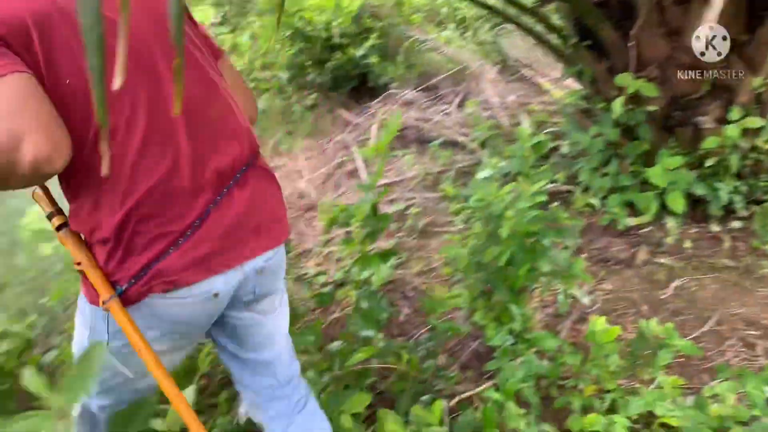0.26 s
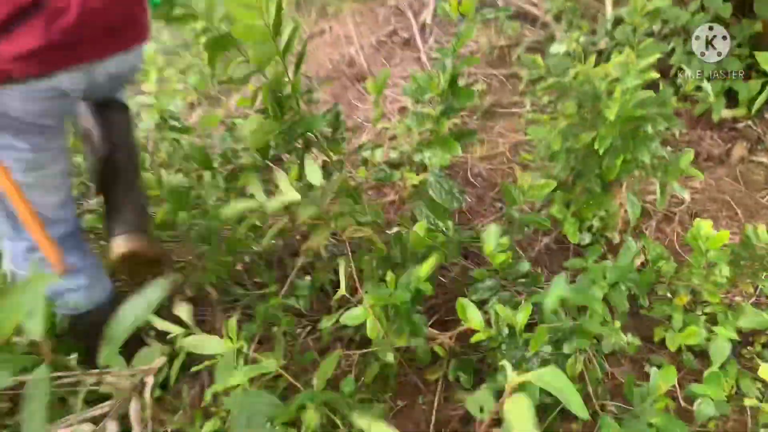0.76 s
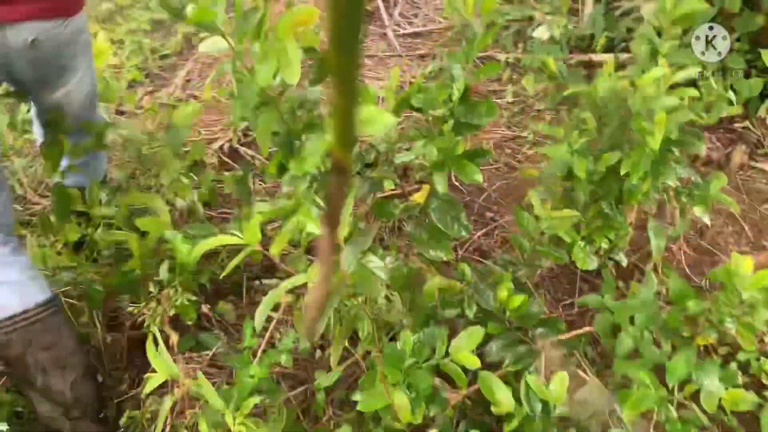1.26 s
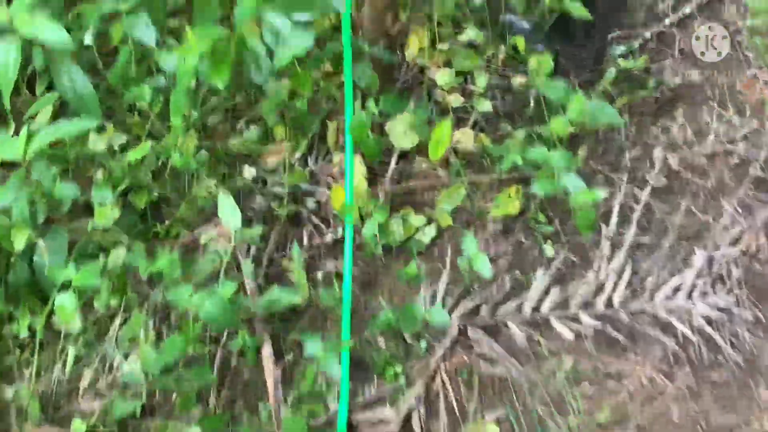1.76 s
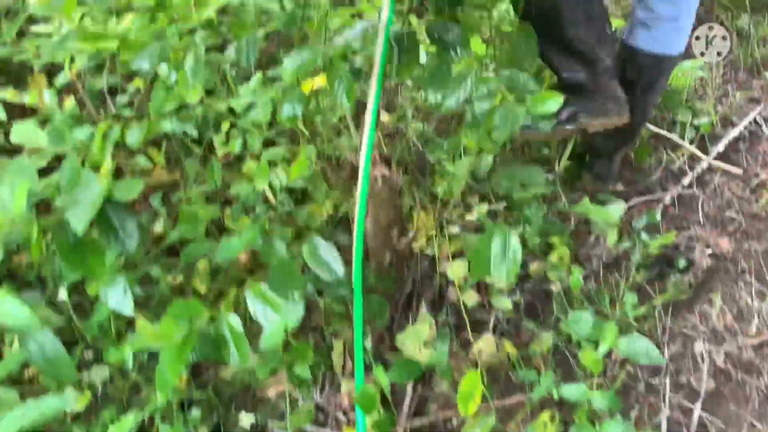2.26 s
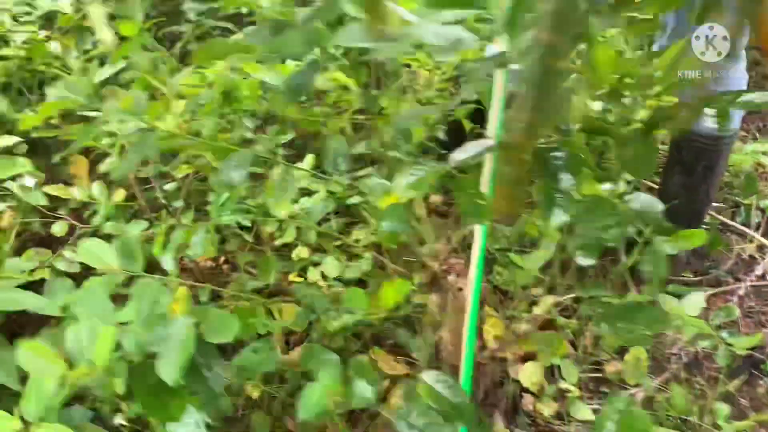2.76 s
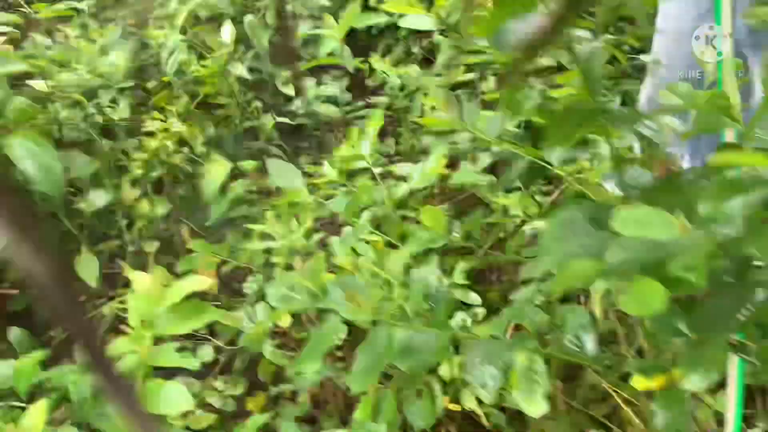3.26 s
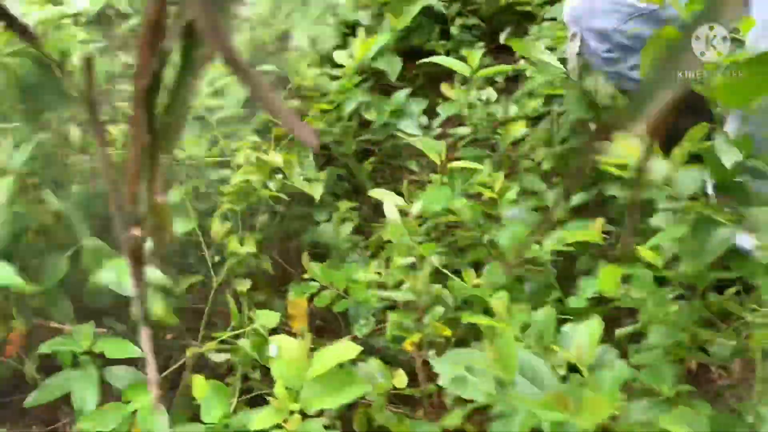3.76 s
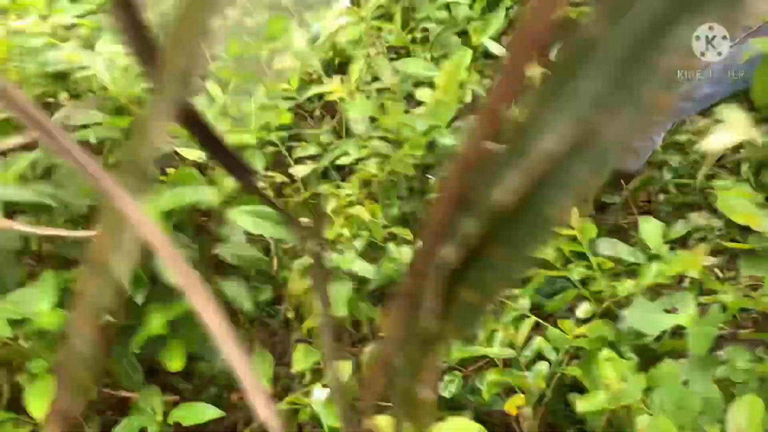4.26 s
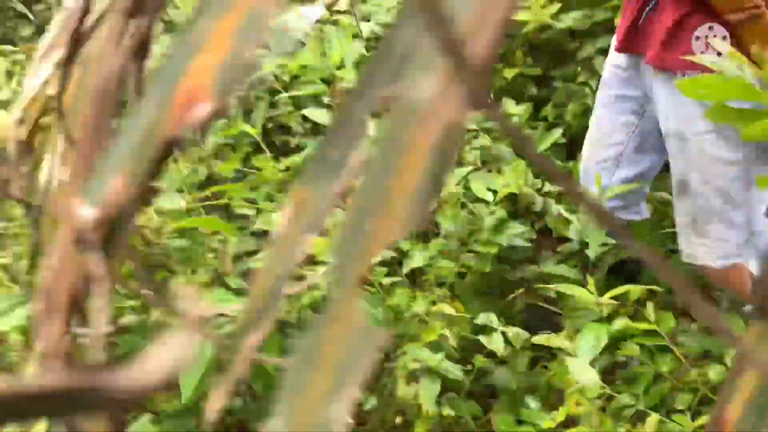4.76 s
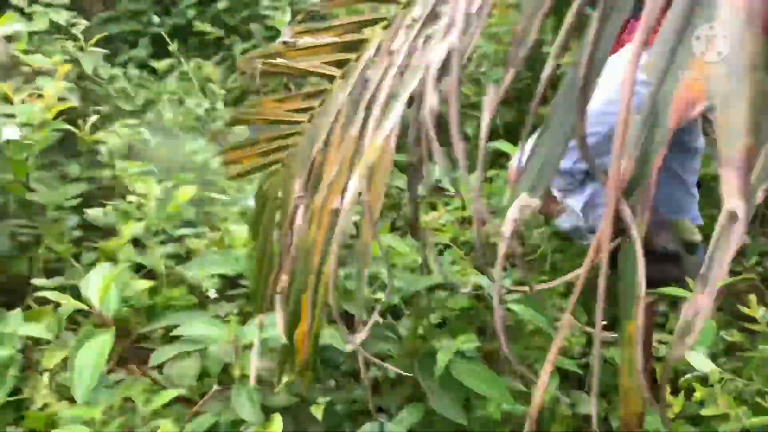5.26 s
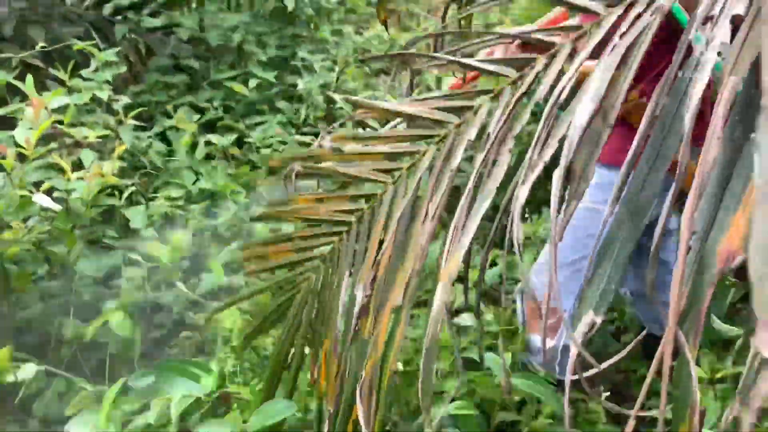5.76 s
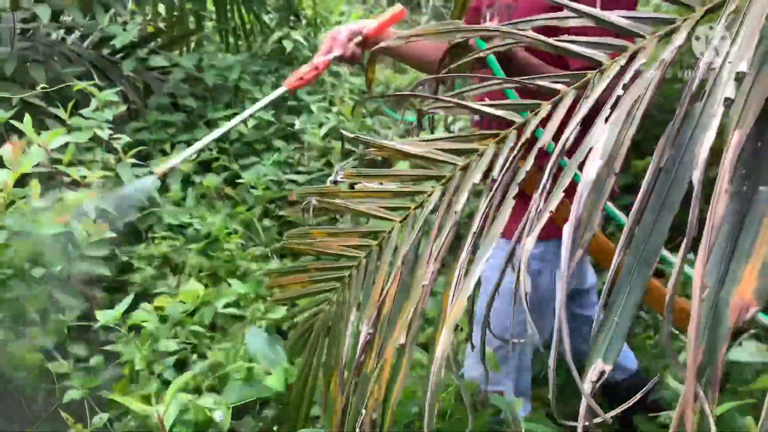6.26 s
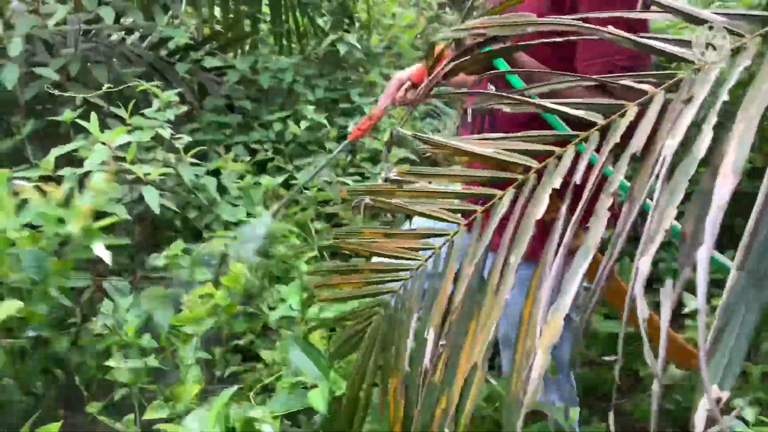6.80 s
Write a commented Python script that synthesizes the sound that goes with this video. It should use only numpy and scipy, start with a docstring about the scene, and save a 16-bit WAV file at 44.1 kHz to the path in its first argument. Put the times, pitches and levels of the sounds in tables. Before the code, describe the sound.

Sharp spray hiss swells and dips above a thudding pump engine as boots crunch through weeds, with a brief silence and later hollow frond knocks.

```python
"""A worker sprays weeds in a palm plantation. From the start the nozzle hisses and mist patters on leaves,
swelling as the wand swings, while a small petrol engine pump thuds steadily under a faint housing whirr.
Leaves crackle, twigs snap, boots tread and scuff on litter. Near 1.5 s all sound fades out and in.
One low handling rumble comes near 3.7 s; from 4.7 s a palm frond knocks on a hard case and drags along it.
Shaped noise makes the spray, litter and rumble; filtered pulses, the engine; bursts and modes, the impacts."""
import sys
import numpy as np
from scipy import signal
from scipy.fft import rfft, irfft, next_fast_len
from scipy.io import wavfile
from scipy.ndimage import uniform_filter1d, map_coordinates

SR = 44100
rng = np.random.default_rng(int(sys.argv[2]) if len(sys.argv) > 2 else 0)


def persist_wave(psi):
    """Save psi, clipped to +-1, as 16-bit WAV."""
    counts = np.round(np.clip(psi, -1, 1) * 32767).astype(np.int16)
    wavfile.write(sys.argv[1], SR, np.atleast_2d(counts).T)


N = 310023
TIME = np.arange(N) / SR
GAP_S = 1.537  # centre of the brief silence; the spray's stereo placement switches here

# Spectrum of breaking stems and twigs. Each row: frequency in Hz, relative level in dB.
CRACK_SPECTRUM = [(700, -72), (3000, -20), (5500, 8), (8500, 22), (16000, 11.5)]


def amp(db):
    """Decibels to gain."""
    return 10 ** (np.asarray(db) / 20)


def unit(x):
    """Scale to rms 1."""
    return x / np.sqrt(np.mean(x ** 2) + 1e-20)


def curves(rows):
    """One value per sample for each column after the time."""
    s, *cols = np.transpose(rows)
    return [np.interp(TIME, s, c) for c in cols]


def wobble(rate):
    """A smooth random curve, rate knots a second."""
    knots = rng.standard_normal(int(N * rate / SR) + 4)
    return map_coordinates(knots, [TIME * rate])


def swell(s, half_s):
    """A Gaussian rise and fall, top 1 at time s, 1/e at half_s either side."""
    return np.exp(-((TIME - s) / half_s) ** 2)


def fall(t, t60):
    """Exponential decay, 60 dB in t60 seconds."""
    return np.exp(-np.log(1000) * t / max(t60, 1e-3))


def filtered(x, response):
    """x times a response of frequency."""
    size = x.shape[-1]
    m = next_fast_len(size + 8192)
    hz = np.fft.rfftfreq(m, 1 / SR)
    return irfft(rfft(x, m) * response(hz), m)[..., :size]


def coloured(x, spectrum):
    """x shaped by (Hz, dB) points on a log frequency axis, at rms 1."""
    f, db = np.transpose(spectrum)
    return unit(filtered(x, lambda hz: amp(np.interp(np.log(hz + 1), np.log(f), db))))


def band(x, centre_hz, width_octaves):
    """A Gaussian band of x; width_octaves is its standard deviation."""
    return filtered(x, lambda hz: np.exp(-(np.log2((hz + 1) / centre_hz) / width_octaves) ** 2 / 2))


def ports(x, lag_ms, diffuse):
    """Stereo from three rows: direct sound, lag_ms later on the left, and scatter left and right."""
    direct = filtered(x[0], lambda hz: np.exp(np.pi * 1j * np.outer([-1, 1], hz) * lag_ms / 1000))
    share = np.clip(diffuse, 0, 1)  # scattered share of power
    return np.sqrt(1 - share) * direct + np.sqrt(share) * x[1:]


def noise(size=N):
    """White noise: a direct row and two scattered rows."""
    return rng.standard_normal((3, size))


def grains(rate, spread_db):
    """Tiny impacts of uneven size at random moments, rate a second, in three rows at rms 1."""
    sizes = amp(spread_db * np.minimum(rng.exponential(size=(3, N)), 4))
    hits = rng.random((3, N)) < rate / SR
    return unit(hits * sizes * rng.choice([-1, 1], (3, N)))


def patches(x, depth_db):
    """Colour that shifts from moment to moment, as one leaf after another is hit."""
    z = signal.stft(x, nperseg=1024)[2]
    field = uniform_filter1d(rng.standard_normal(z.shape[1:]), size=14, axis=0)  # across frequency
    field = uniform_filter1d(field, size=7, axis=1)  # across time
    return signal.istft(z * amp(depth_db * unit(field)), nperseg=1024)[1][:, :N]


def resonance(centre_hz, width_hz):
    """A narrow band at rms 1: slow noise times a carrier; its centre may be a curve."""
    slow = filtered(noise(), lambda hz: 1 / (1 + (2 * hz / width_hz) ** 2))
    carrier = np.cos(2 * np.pi * np.cumsum(centre_hz * np.ones(N)) / SR)
    return unit(ports(slow * carrier, lag_ms=0, diffuse=0.52))


def struck(x):
    """Scale a hit to rms 1 over its first 5 ms."""
    return x / np.sqrt(np.mean(x[..., :SR // 200] ** 2))


def splinters(size, rate=1500, spread_db=5.5, smooth=.6):
    """Dense, uneven ticks of tearing fibres over noise, in three rows at rms 1."""
    sizes = amp(spread_db * np.minimum(rng.exponential(size=(3, size)), 3))
    ticks = (rng.random((3, size)) < rate / SR) * sizes * rng.choice([-1, 1], (3, size))
    return unit(unit(ticks) + smooth * noise(size))


def add(track, s, sound):
    """Mix a sound in at time s."""
    part = track[:, round(s * SR):][:, :sound.shape[-1]]
    part += sound[..., :part.shape[-1]]


def spray(hiss_db=-1, mist_db=-3, murmur_db=2.5, drops=0.61, drum_db=-20, patchy_db=1.5, mist_swing=0.96):
    """The jet hisses from one point; its droplets patter over a wide patch of leaves and drum on broad ones."""
    # Spectra. Each row: frequency in Hz, relative level in dB.
    nozzle_spectrum = [(1500, -61), (4000, -77), (6200, -3), (8300, 1.5), (11000, 1.5), (14000, 0.5),
                       (16000, 0.5)]
    mist_spectrum = [(400, -12), (1000, -12), (1550, 0), (2200, 2.5), (3000, 4.5), (4400, 8.5), (6500, 7.5),
                     (9000, 5), (16000, -80)]
    undergrowth_spectrum = [(20, -10), (60, 4), (150, 12.5), (280, 1.5), (480, -6.5), (680, -5.5),
                            (860, -3), (1100, -4), (1300, -4), (1700, -8), (2500, -5), (6000, -77)]
    # Levels before swings and trims as the worker moves. Each row: time in seconds, nozzle hiss in dB,
    # mist on leaves in dB, low rush of the undergrowth in dB.
    spray_levels = [(0, -33.5, -39.5, -45.5), (.28, -33.5, -41, -49.5), (.5, -39, -43.5, -48.5),
                    (.75, -35.5, -38.5, -45), (1.1, -33.5, -40.5, -50), (1.9, -38.5, -41, -49),
                    (2.7, -33, -39, -48), (3.0, -30, -34.5, -46.5), (4.3, -31, -38, -44.5),
                    (4.95, -33.5, -36, -44.5), (5.15, -32, -32.5, -52), (5.45, -31.5, -38, -44),
                    (5.95, -30, -36, -49), (7, -29, -36.5, -47)]
    # Wand swings towards the listener. Each row: centre in seconds, hiss gain in dB, half-length in seconds.
    wand_swings = [(1.083, 6, 0.028), (1.908, 7.5, 0.16), (2.363, 4, 0.22), (3.01, 0.5, 0.05),
                   (3.753, 6.5, 0.13), (4.07, 2.5, 0.078), (4.499, 6.5, 0.18), (5.596, 4.5, 0.13),
                   (6.385, 3, 0.094), (6.69, 2, 0.023), (6.96, 3.5, 0.053)]
    # Drumming pitch of the leaves met. Each row: time in seconds, centre in Hz.
    drum_pitch = [(3.0, 1593), (3.75, 1472), (4.15, 1444), (4.55, 1600), (5.3, 1703), (5.7, 1720),
                  (6.3, 1397), (7, 1295)]
    swing = sum(db * swell(s, half_s) for s, db, half_s in wand_swings)
    hiss_level, mist_level, murmur_level = curves(spray_levels)
    hiss_level = hiss_level + swing
    mist_level = mist_level + mist_swing * swing

    before = ports(noise(), lag_ms=0.1245, diffuse=0.0062)
    after = ports(noise(), lag_ms=0.2158, diffuse=0.00097)
    jet = coloured(np.where(TIME < GAP_S, before, after), nozzle_spectrum)
    flutter = .75 * wobble(25) + .45 * wobble(140)  # dB; the liquid sheet tears unevenly

    droplets = noise() + drops * grains(rate=2000, spread_db=7.0)
    # the wetted patch comes into the open
    spread = np.interp(TIME, [2, 5.4, 6.2, 7], [0.98, 0.84, 0.013, 0.53])
    before = ports(droplets, lag_ms=0.079, diffuse=0.1)
    after = ports(droplets, lag_ms=-0.18, diffuse=spread)
    wetted = np.where(TIME < GAP_S, before, after)
    drumming = resonance(curves(drum_pitch)[0], width_hz=250)
    patter = coloured(patches(wetted, patchy_db), mist_spectrum) + amp(drum_db) * drumming
    gusts = .9 * wobble(12)  # dB

    rush = ports(noise() + .5 * grains(rate=250, spread_db=3.0), lag_ms=-0.02, diffuse=0.39)
    murmur = coloured(patches(rush, patchy_db), undergrowth_spectrum)
    return (amp(hiss_level + hiss_db + flutter) * jet
            + amp(mist_level + mist_db + flutter + gusts) * patter * amp([[-.5], [.5]])
            + amp(murmur_level + murmur_db + 0.77 * wobble(22)) * murmur)


def housing(waver_db=2):
    """The engine's housing rings: narrow noise bands give a faint, wavering whirr."""
    # Each row: centre in Hz, width in Hz, mean level in dB.
    housing_modes = [(878.5, 77, -62), (1172, 38, -67.5)]
    return sum(amp(db + waver_db * wobble(5)) * resonance(hz, width_hz) for hz, width_hz, db in housing_modes)


def engine(echo=0.33, echo_s=0.01377, scatter_db=-22, size_db=-1.0, puff_db=-21, puff_t60=.04,
           clack_db=-43, clack_hz=680, clack_t60=0.0039):
    """A governed four-stroke: one muffled exhaust thud every second turn, echoed by the palm trunks."""
    # Muffled exhaust spectrum. Each row: frequency in Hz, relative level in dB.
    exhaust_spectrum = [(15, -59), (30, -35), (42, -5), (56, -2.5), (80, 4), (110, 5.5), (150, 6.5),
                        (178, -17), (215, -14.5), (300, -32), (480, -26), (1000, -94)]
    # Thud and puff level before stereo balance. Each row: time in seconds, level in dB.
    engine_level = [(0, -35.5), (1.7, -38.5), (4.85, -38), (5.03, -40), (5.4, -37), (7, -37.5)]
    firings = np.r_[np.arange(.0635, 1.5, .06937), np.arange(1.5575, 7.02, .06928)]
    timing_wobble_s = 0.00019 * np.sin(2 * np.pi * 6.6 * firings)  # slight, regular
    pulses = np.zeros(N)
    sizes = amp(size_db * rng.standard_normal(len(firings)))
    pulses[np.round((firings + timing_wobble_s) * SR).astype(int)] = -sizes

    near = filtered(pulses, lambda hz: 1 + echo * np.exp(-2j * np.pi * hz * echo_s))
    t = np.arange(SR // 4) / SR
    grove = rng.standard_normal((2, len(t))) * fall(t, t60=0.32)
    grove = grove / np.linalg.norm(grove[0])
    far = signal.fftconvolve(pulses[None], grove, axes=1)[:, :N]
    blast = ports(np.vstack([near, amp(scatter_db) * far]), lag_ms=-0.69, diffuse=0.74)
    thuds = coloured(blast, exhaust_spectrum)

    # turbulent gas makes every stroke different
    gas = np.abs(signal.fftconvolve(-pulses, fall(t, puff_t60))[:N])
    puffs = coloured(gas * ports(noise(), lag_ms=-0.58, diffuse=0.12), exhaust_spectrum)
    thuds = thuds + amp(puff_db) * puffs

    valve_s = np.maximum(t - .009, 0)  # a faint valve clack 9 ms after each firing
    clack = fall(valve_s, clack_t60) * np.sin(2 * np.pi * clack_hz * valve_s)
    clacks = signal.fftconvolve(pulses, clack)[:N]
    balance = amp([[-.8], [.8]])
    return (amp(curves(engine_level)[0]) * thuds + amp(clack_db) * clacks) * balance


def leaves():
    """Stems and leaves crackle in quick clumps as legs push through."""
    # Each row: centre in seconds, level in dB, half-length in seconds.
    brushes = [(0.086, -44, .05), (0.245, -30, 0.013), (0.287, -45, 0.12), (0.303, -41, 0.012),
               (0.325, -45, .009), (0.569, -36, 0.011), (0.9, -40.5, 0.26), (1.205, -42, .02),
               (2.01, -54, 0.089), (3.19, -48.5, 0.35), (5.128, -51, 0.062)]
    clumping_db = 1.2 * wobble(14) + 3 * wobble(90)
    ticks = grains(rate=900, spread_db=4) * amp(clumping_db)
    push = sum(amp(db) * swell(s, half_s) for s, db, half_s in brushes)
    return push * coloured(ports(ticks, lag_ms=0.11, diffuse=0.22), CRACK_SPECTRUM)


def twigs(crack_db=3.0, ring_db=3, thud_db=4.5, ring_tail_db=-6):
    """A twig breaks in under two milliseconds and rings; its last fibres splinter in a crackling tail."""
    # Dry breaks, levels before trims. Each row: start in seconds, crack in dB, ring in dB, low mode in Hz,
    # high mode in Hz, thud in dB, splintering tail relative to the break in dB.
    snaps = [(.1052, -46, -39, 2200, 3700, -50, -6), (.2447, -34, -40, 1800, 4300, -47, -2),
             (.2975, -35, -43, 1700, 4300, -52, -3), (.4657, -32, -40, 1750, 3900, -44, -10),
             (.5665, -35, -38, 3800, 6000, -56, 0), (.5792, -27, -27, 3000, 5800, -42, -7),
             (.7293, -25, -24, 3600, 7900, -42, -12), (.7468, -25, -30, 2200, 3800, -38, -9),
             (.8045, -35, -38, 2900, 4200, -60, -2), (.8465, -38, -44, 2000, 3900, -50, -8),
             (.8738, -18.5, -25, 2200, 3800, -25, -8), (.8825, -19, -29, 1900, 4000, -29, -6),
             (.8895, -32, -39, 2200, 3700, -39, -4), (.9105, -35, -44, 2400, 4000, -50, -9),
             (.9215, -37, -36, 1900, 3700, -36, 0), (.9318, -38, -38, 2000, 3300, -46, 0),
             (.9397, -23, -26, 2900, 3900, -38, -9), (1.0133, -40, -43, 2200, 3500, -60, -5),
             (1.0625, -33, -42, 2600, 4500, -55, -1), (1.2185, -23, -36, 2100, 3800, -47, -9),
             (1.4188, -36, -44, 2300, 3800, -60, -2), (1.7063, -21.5, -16, 2020, 4400, -56, -5),
             (1.7127, -28, -36, 2000, 4400, -60, -4), (1.7485, -42, -36, 2100, 4600, -58, 0),
             (1.9096, -22, -21, 1950, 4250, -41, -4), (1.9914, -32, -34, 2800, 4800, -60, -7),
             (2.037, -36, -37, 2500, 4300, -48, -4), (2.0907, -36, -39, 3000, 5000, -60, -4),
             (2.1048, -37, -34, 2600, 4200, -44, -4), (2.408, -26.5, -25.5, 3000, 4550, -35, -3),
             (3.2904, -25.5, -33, 2350, 4700, -60, -10), (3.3672, -19, -22, 1520, 2330, -36, -3),
             (3.3705, -22.5, -30, 2300, 4900, -42, -2), (3.4595, -44, -40, 2800, 3400, -60, -8),
             (3.4718, -27.5, -45, 2500, 4000, -52, -10), (4.1029, -25, -42, 1200, 3100, -43, -12),
             (5.0265, -38, -38, 1400, 2000, -48, -5), (5.0467, -39, -37, 1650, 2500, -50, -6),
             (5.0821, -26.5, -38, 3400, 4400, -55, -9)]
    # Thud spectrum on litter. Each row: frequency in Hz, relative level in dB.
    litter_spectrum = [(50, -42), (220, -2.5), (450, -6), (950, 0.5), (1400, -7), (2500, -20), (6000, -14)]
    break_s, snap_t60, tail_t60 = .0014, .004, .07
    twig_q, low_mode_db, overtone, overtone_db = 3.2, -2.5, 1.46, -5  # overtone: ratio to the high mode
    out, t = np.zeros((2, N)), np.arange(SR // 8) / SR
    burst = (1 - np.exp(-t / .0002)) * fall(np.maximum(t - break_s, 0), snap_t60)
    after = (1 - np.exp(-t / .001)) * fall(t, tail_t60)

    def tear(tail_db):
        fibres = burst * noise(len(t)) + amp(tail_db) * after * splinters(len(t))
        return ports(fibres, lag_ms=0.12, diffuse=0.94)

    def bend(x, f):
        return struck(filtered(x, lambda hz: 1 / (1 + 1j * twig_q * ((hz + 1) / f - f / (hz + 1))) ** 2))

    for s, crack, ring, low_hz, high_hz, thud, tail in snaps:
        jolt = tear(tail + ring_tail_db)
        partials = [(low_hz, low_mode_db), (high_hz, 0), (overtone * high_hz, overtone_db)]
        modes = sum(amp(db) * bend(jolt, f) for f, db in partials)
        crack_sound = struck(coloured(tear(tail), CRACK_SPECTRUM))
        thud_sound = struck(coloured(tear(tail + ring_tail_db), litter_spectrum))
        add(out, s, amp(crack + crack_db) * crack_sound
            + amp(ring + ring_db) * struck(modes)
            + amp(thud + thud_db) * thud_sound)
    return out


def boots(trim_db=1, width_octaves=0.85, tap_t60=0.015, tail_db=-17, tail_t60=0.13):
    """Each contact is a short, dull tap, after which the litter settles."""
    # Treads on sticks and damp litter. Each row: start in seconds, level before trim in dB,
    # band centre in Hz before the 0.9 factor.
    steps = [(.252, -45, 900), (.963, -42, 1700), (1.073, -45, 900), (1.146, -47, 950), (1.180, -44, 850),
             (1.348, -41, 500), (2.156, -43, 1150), (2.416, -43, 700), (2.424, -40, 1200),
             (2.435, -40, 500), (2.458, -31, 800), (2.469, -41, 1000), (2.475, -38, 600), (3.644, -44, 380),
             (4.019, -32, 1000), (5.028, -41, 380), (5.047, -42, 400), (5.445, -41, 900)]
    out, t = np.zeros((2, N)), np.arange(SR // 8) / SR
    shape = (1 - np.exp(-t / .0005)) * (fall(t, tap_t60) + amp(tail_db) * fall(t, tail_t60))
    for s, level_db, centre_hz in steps:
        contact = shape * ports(noise(len(t)), lag_ms=0, diffuse=0.25)
        tap = band(contact, 0.9 * centre_hz, width_octaves)
        add(out, s, amp(level_db + trim_db) * struck(tap))
    return out


def scuffs_and_rumble(width_octaves=0.32, grit=0.83):
    """Boot scuffs, and one low handling rumble near 3.7 s: soft, grainy noise bands that swell and fade."""
    # Each row: centre in seconds, level in dB, half-length in seconds, band centre in Hz.
    soft_bands = [(0.273, -56, 0.083, 420), (.895, -59, 0.024, 695), (0.887, -45, 0.023, 372),
                  (1.114, -52, 0.14, 925), (1.18, -54.5, 0.09, 410), (1.347, -45.5, 0.053, 276),
                  (2.463, -41, 0.028, 308), (2.465, -46, 0.026, 850), (3.383, -37.5, 0.021, 219),
                  (3.68, -39, 0.045, 145), (5.035, -47, 0.028, 400), (5.04, -50, 0.017, 1650)]
    grainy = ports(noise() + grit * grains(rate=430, spread_db=2.0), lag_ms=0, diffuse=0.32)
    return sum(amp(db) * swell(s, half_s) * unit(band(grainy, centre_hz, width_octaves))
               for s, db, half_s, centre_hz in soft_bands)


def frond(skew=0.81, attack_s=0.00067):
    """The frond knocks on a hard case and scrapes along it; harder knocks ring the higher modes."""
    # Modes of the case. Each row: frequency in Hz, relative level in dB, t60 in seconds.
    case_modes = [(66, -3.5, 0.066), (109, 2.5, 0.093), (179, -0.5, 0.068), (311, 5.5, 0.017),
                  (558, -8.5, 0.019), (745, -8, 0.038), (1350, -18.5, 0.015), (1960, -23.5, 0.011),
                  (3260, -25, 0.0051), (4700, -21, 0.004)]
    # Knocks. Each row: start in seconds, level in dB, hardness in dB per octave above the lowest mode.
    knocks = [(4.7185, -5.5, 1.5), (4.725, -9, -14), (4.7369, -11, -2), (4.753, -15, -1.5),
              (4.7697, -12, -6), (4.78, -22, -9), (4.8092, -15.5, 0.5), (4.846, -17.5, -1.5),
              (4.8807, -23, 0), (4.8984, -4, 6.5), (4.908, -14, -15)]
    # Drags between knocks. Each row: centre in seconds, level in dB, half-length in seconds.
    drags = [(4.742, -26.5, 0.017), (4.83, -30.5, 0.009), (4.852, -32, 0.014), (4.886, -32, .006),
             (4.903, -22.5, 0.008)]
    # Scrape spectrum. Each row: frequency in Hz, relative level in dB.
    scrape_spectrum = [(25, -13), (70, 8.5), (250, -4.5), (600, -4), (1100, -15.5), (3000, -24),
                       (8000, -54)]
    out, t = np.zeros((2, N)), np.arange(SR // 4) / SR
    phase = skew * np.array([[1], [0]])  # radians; the shake reaches the left later
    mode_hz, mode_db, mode_t60 = np.transpose(case_modes)
    signs = (-1) ** np.arange(len(mode_hz))
    for s, db, hardness in knocks:
        gains = amp(mode_db + hardness * np.log2(mode_hz / mode_hz[0])) * signs
        ring = sum(g * fall(t, t60) * np.sin(2 * np.pi * hz * t - phase)
                   for g, hz, t60 in zip(gains, mode_hz, mode_t60))
        add(out, s, amp(db) * (1 - np.exp(-t / attack_s)) * ring / np.linalg.norm(gains))
    rubbing = ports(.5 * noise() + grains(rate=960, spread_db=2.0), lag_ms=0.51, diffuse=0.29)
    drag = sum(amp(db) * swell(s, half_s) for s, db, half_s in drags)
    return out + drag * coloured(rubbing, scrape_spectrum)


def scene():
    """Everything heard among the weeds."""
    return spray() + housing() + engine() + leaves() + twigs() + boots() + scuffs_and_rumble() + frond()


def record(dry, fade_s=0.11, silent_half_s=.017, bass_hz=42, top_hz=15900):
    """A short fade out and in around GAP_S, then a bass roll-off (-6 dB at bass_hz) and a sharp treble limit."""
    fade = np.clip((np.abs(TIME - GAP_S) - silent_half_s) / fade_s, 0, 1)
    return filtered(dry * fade, lambda hz: (hz < top_hz) * hz ** 4 / (hz ** 4 + bass_hz ** 4))


dry = scene()
out = record(dry)
persist_wave(out)
```